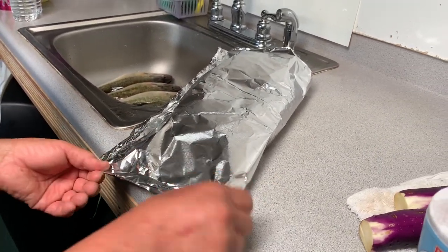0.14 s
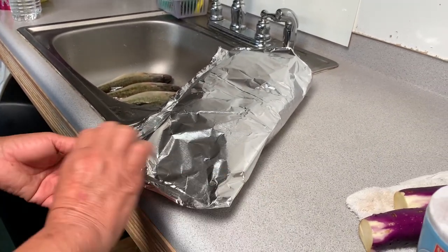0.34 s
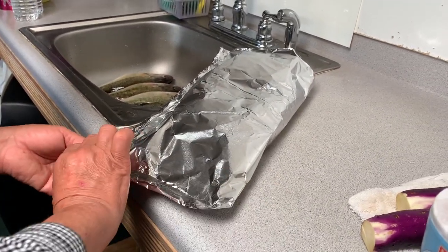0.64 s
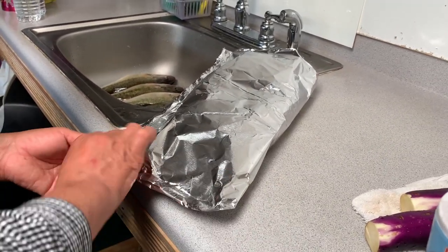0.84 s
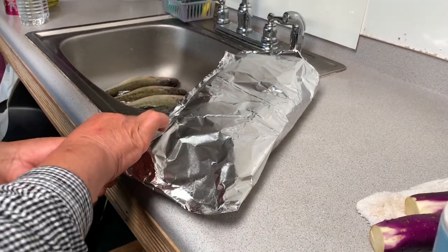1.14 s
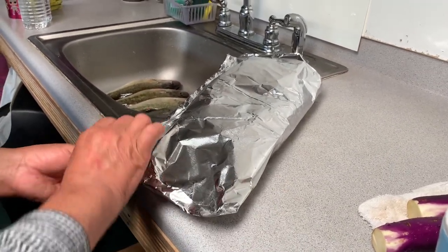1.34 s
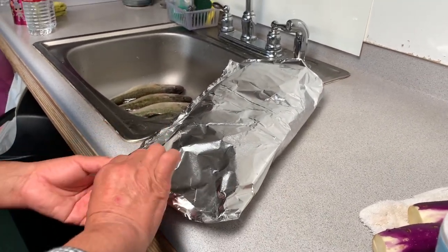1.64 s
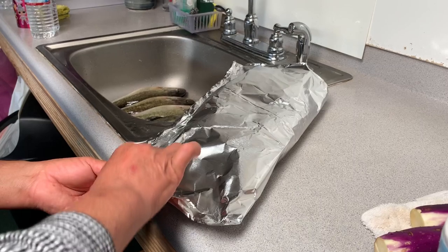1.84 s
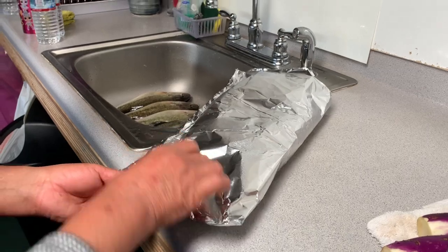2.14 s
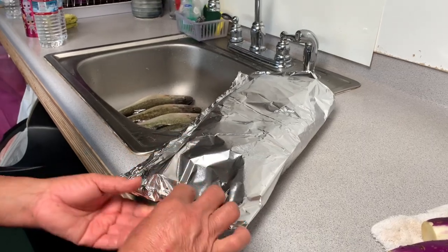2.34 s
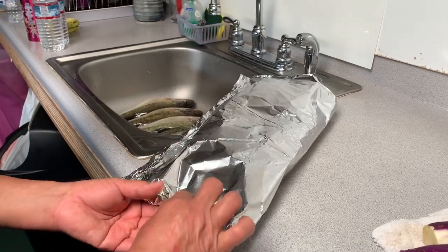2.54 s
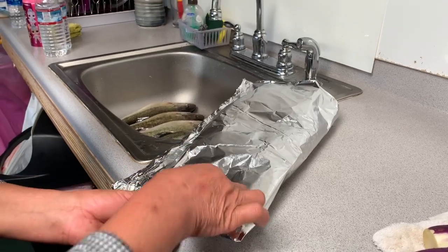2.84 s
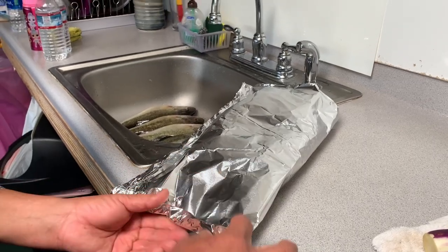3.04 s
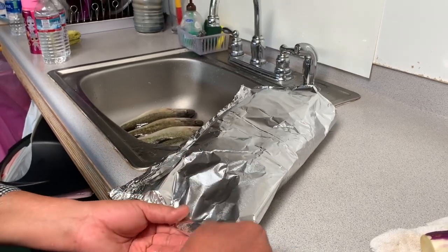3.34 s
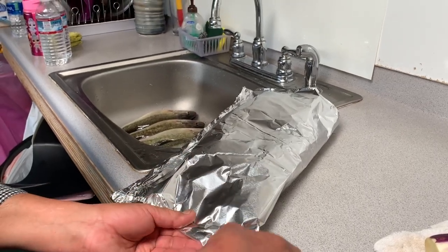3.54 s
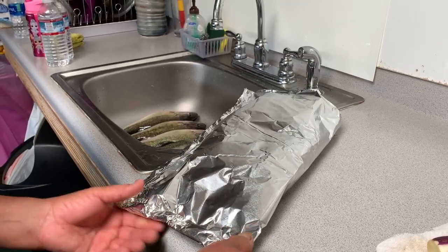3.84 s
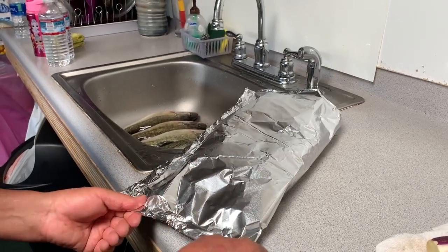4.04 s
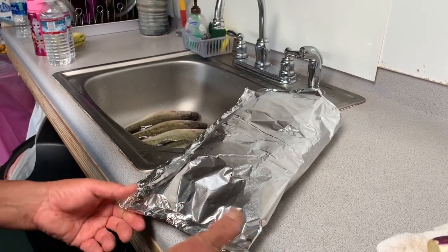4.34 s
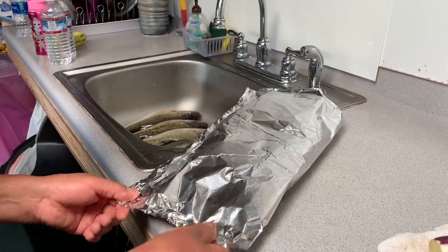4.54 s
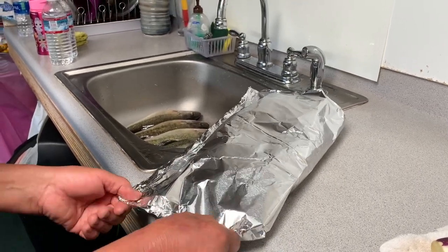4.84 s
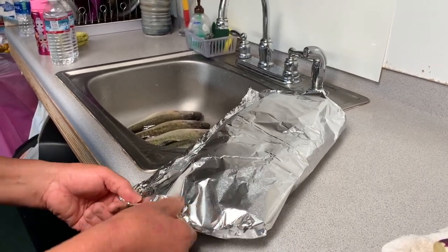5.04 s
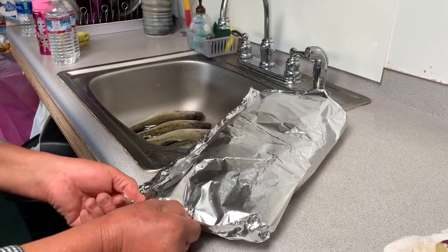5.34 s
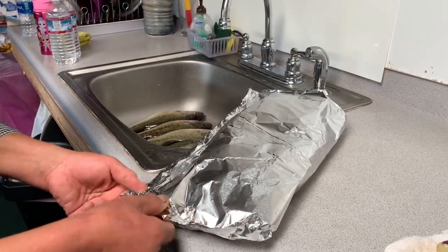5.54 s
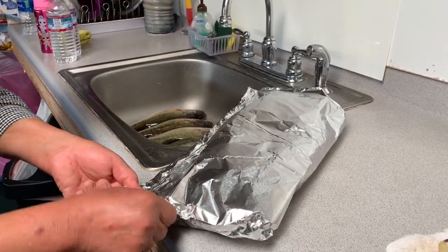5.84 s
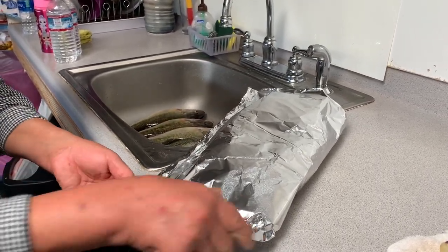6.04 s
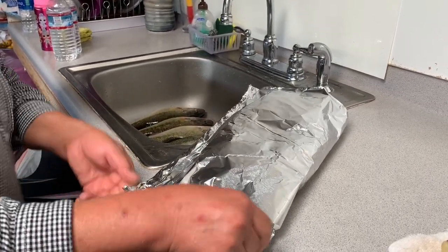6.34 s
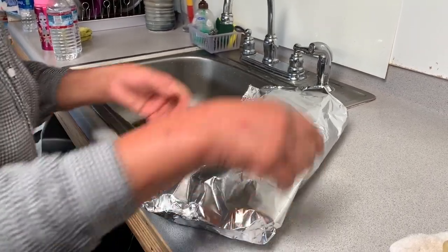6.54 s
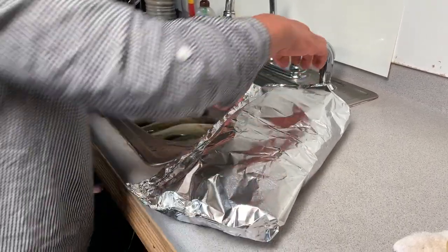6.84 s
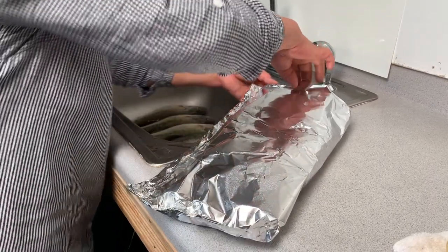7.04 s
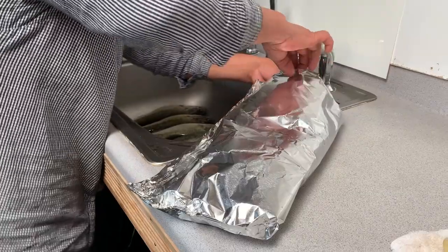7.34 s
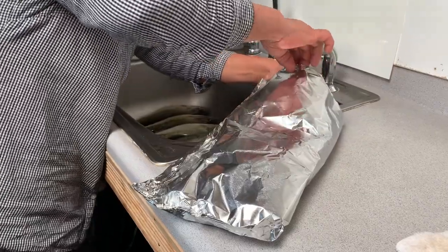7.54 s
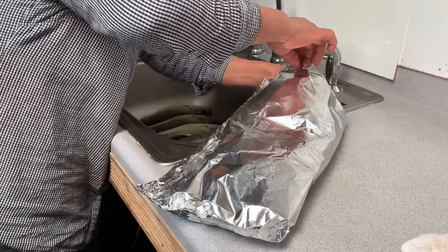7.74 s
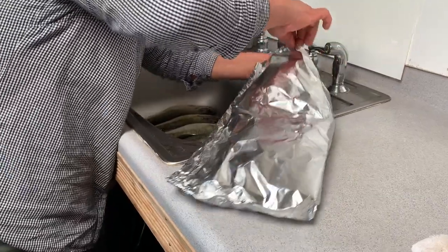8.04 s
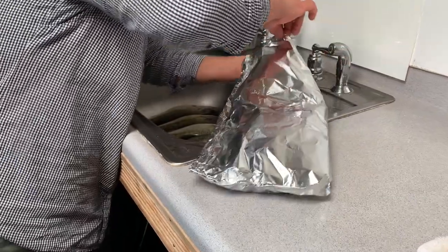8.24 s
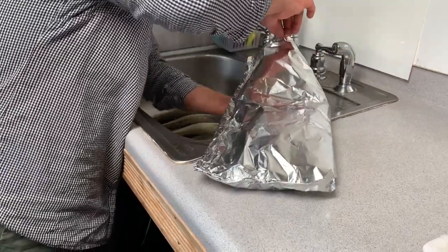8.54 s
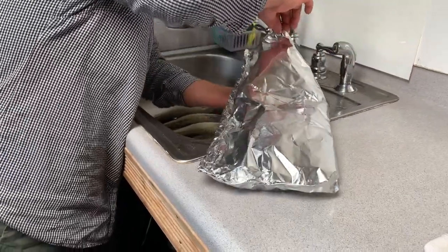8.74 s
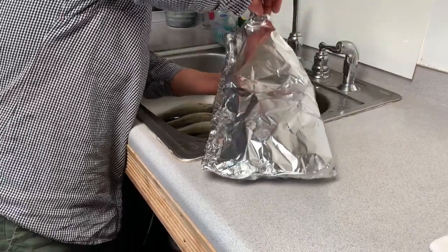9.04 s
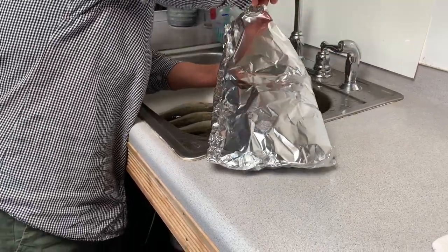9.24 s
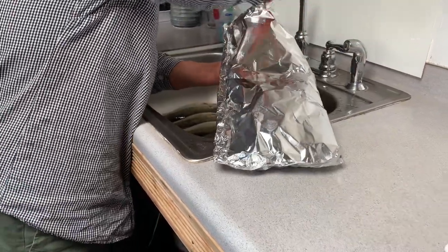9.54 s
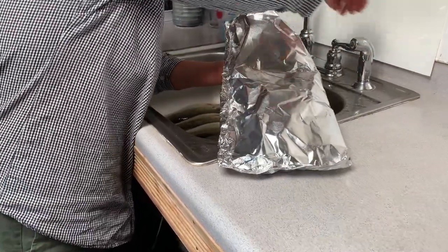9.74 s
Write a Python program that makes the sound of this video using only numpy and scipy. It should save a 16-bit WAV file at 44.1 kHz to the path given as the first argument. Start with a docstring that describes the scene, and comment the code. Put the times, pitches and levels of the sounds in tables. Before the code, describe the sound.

Close to a phone in a small hard-walled kitchen, hands crimp a foil parcel. Quiet, sparse crackles at first grow into dense bright snaps and tinny pops, pause briefly past the middle, then return as longer rustling crumples. Soft hollow bumps come from the counter. Low engine drones and traffic rumble sit far behind.

```python
"""Folding foil on a kitchen counter

Hands fold and crimp aluminium foil close to a phone: the sheet buckles in sharp snaps over a dense crackle,
both made of noise under bursts of power, with ringing dents and pops. The parcel bumps the counter (damped
notes and thuds) and something rubs (thin hiss). Engines drone outside (two sines each), mostly sinking in
pitch as they pass, over the rumble and air of the room (coloured noise)."""
import sys
import numpy as np
from scipy import signal
from scipy.fft import rfft, irfft, next_fast_len
from scipy.io import wavfile
from scipy.ndimage import uniform_filter1d, map_coordinates

SR = 44100
rng = np.random.default_rng(int(sys.argv[2]) if len(sys.argv) > 2 else 0)


def wav_record(signal):
    """Record a signal, one row per channel, as 16-bit PCM in the file named by sys.argv[1]."""
    frames = np.transpose(np.atleast_2d(signal))
    bounded = np.clip(frames, -1, 1)
    # unit amplitude maps onto the largest positive 16-bit level
    quanta = np.round(bounded * 32767).astype(np.int16)
    wavfile.write(sys.argv[1], SR, quanta)


N = 436590

# each grip of the fingers on the foil; levels before trims:
# full_grip_s, swell_before_s, held_s, crackle_db, body_over_crackle_db
GRIP_ROWS = [(0.0, .03, 0.096, -45.5, 3), (0.14, .03, 0.095, -44.5, 2.5), (0.328, .02, .05, -55, 2.5),
             (0.57, .03, .05, -66, -1), (0.8, 0.051, 0.055, -54, 2.5), (0.899, .07, 0.014, -39, -5),
             (1.075, 0.027, 0.16, -40.5, -3), (1.25, .04, 0.018, -40.5, 2.5),
             (1.381, .02, 0.0089, -42, 5.5), (1.489, 0.031, .04, -55, 5), (1.665, .02, .03, -55.5, 4.5),
             (1.742, 0.042, 0.11, -33.5, 0), (1.969, 0.068, 0.024, -27.5, -1.5),
             (2.081, .04, .1, -41.5, -1), (2.18, 0.037, 0.014, -42, 3.5), (2.269, 0.018, .02, -45, 5),
             (2.485, .02, .02, -38, 3), (2.524, .025, 0.046, -25.5, -2), (2.62, .05, .08, -33, 2.5),
             (2.719, .05, .05, -21.5, -6.5), (2.8, .04, .03, -33.5, 0.5), (2.87, .03, .03, -47, 8),
             (2.939, 0.09, .02, -36, 1.5), (3.06, 0.047, .03, -45.5, 8), (3.21, 0.016, .02, -46.5, 5),
             (3.29, 0.013, .05, -34, 0), (3.4, 0.045, 0.085, -33.5, 1), (3.739, 0.064, 0.035, -32, -1.5),
             (3.88, 0.057, .1, -54.5, 4), (4.03, 0.052, .08, -49.5, 7), (4.233, .02, 0.08, -47, 7.5),
             (4.572, 0.024, 0.096, -34, 0.5), (4.71, .04, .04, -27, -0.5), (4.868, .03, .06, -44.5, 6.5),
             (5.04, .02, .02, -61, 7), (5.09, .02, .18, -39.5, -1), (5.29, 0.03, 0.0076, -27.5, -3.5),
             (5.4, 0.051, .05, -54, 4.5), (5.5, 0.03, .02, -37.5, -1.5), (5.615, .02, .04, -34, -1.5),
             (5.659, .04, 0.0082, -32.5, 2), (5.71, 0.046, 0.074, -34.5, -1.5), (5.889, .04, .08, -49.5, 5),
             (6.165, .03, .06, -38, -2), (6.28, .03, .04, -38, 3), (6.399, 0.033, 0.045, -55, 12.5),
             (6.52, .03, .03, -63, 4), (6.62, 0.049, 0.037, -69, 6.5), (7.131, .02, .02, -26.5, -3.5),
             (7.2, .05, .08, -33.5, -3.5), (7.32, .05, 0.067, -43.5, 2.5), (7.47, 0.11, 0.082, -40, 1.5),
             (7.6, .05, 0.18, -42.5, 0), (7.785, .03, .02, -31.5, -5), (7.87, 0.052, 0.23, -35.5, -0.5),
             (8.04, 0.23, 0.21, -27, -4.5), (8.33, 0.045, 0.026, -35.5, -0.5), (8.45, 0.054, .08, -66.5, 6),
             (8.61, .02, .04, -58, 7), (8.672, 0.02, .02, -35, -3.5), (8.76, 0.14, .14, -39, -0.5),
             (8.95, .05, .05, -38.5, -2), (9.05, 0.12, .07, -29.5, -3), (9.15, .05, 0.053, -33.5, -3.5),
             (9.25, 0.055, 0.084, -43, 1), (9.4, 0.066, 0.066, -53, 6.5), (9.498, 0.054, .02, -45, 2.5)]
# left-right likeness of the near sounds: pitch_hz, likeness (1 = identical)
NEAR_ALIKE = [(200, .96), (700, .8), (1300, .84), (2200, .5), (2800, .66), (3600, .25), (6000, .1)]


def amp(db):
    """dB to gain."""
    return 10 ** (np.asarray(db) / 20)


def unit(x):
    """Scaled to rms 1."""
    return x / np.sqrt(np.mean(x ** 2) + 1e-20)


def along(points, hz):
    """(Hz, value) points joined by straight lines on a log frequency axis."""
    f, v = np.transpose(points)
    return np.interp(np.log(hz + 1), np.log(f + 1), v)


def curves(rows):
    """One value per sample for each column after the time."""
    s, *cols = np.transpose(rows)
    return [np.interp(np.arange(N) / SR, s, c) for c in cols]


def wobble(rate):
    """A smooth random curve through `rate` knots a second."""
    knots = rng.standard_normal(int(N * rate / SR) + 4)
    return map_coordinates(knots, [np.arange(N) * rate / SR])


def filtered(x, response):
    """x times a complex response of frequency."""
    m = next_fast_len(N + SR // 2)
    return irfft(rfft(x, m) * response(np.fft.rfftfreq(m, 1 / SR)), m)[..., :N]


def spread(pair, spectrum, alike):
    """Two unrelated noises, coloured at unchanged power and mixed to a left and right of given likeness."""
    hz = np.fft.rfftfreq(next_fast_len(N + SR // 2), 1 / SR)
    turn = np.arccos(np.clip(along(alike, hz), -1, 1)) / 2
    audible = hz > spectrum[0][0] / 2
    shape = unit(amp(along(spectrum, hz)) * audible)
    mid, side = filtered(pair, lambda hz: shape * [np.cos(turn), np.sin(turn)])
    return np.array([mid + side, mid - side])


def bursts(strength, t60):
    """Power that jumps at each impulse and dies 60 dB in t60 seconds, 1 on average."""
    power = signal.lfilter([1], [1, -amp(-120 / (t60 * SR))], strength ** 2)
    return power / power.mean()


def tears(times, db, lengths, rise):
    """Power under one rise and fall for each event; the rise is a share of the length."""
    power = np.zeros(N + SR)
    for s, level_db, length in zip(times, db, lengths):
        t = np.arange(round(length * SR)) / SR
        attack = 1 - np.exp(-t / (rise * length))
        shape = attack * amp(level_db - 60 * t / length)
        power[round(s * SR):][:len(t)] += shape ** 2
    return power[:N]


def rings(events, cycles, gain_db):
    """A damped sine for each (s, dB, Hz): full after one cycle, its decay reaching -60 dB after `cycles`."""
    out, t = np.zeros(N + SR), np.arange(SR // 10) / SR
    for s, db, hz in events:
        shape = np.minimum(t * hz, 1) * amp(db + gain_db - 60 * t * hz / cycles)
        out[round(s * SR):][:len(t)] += shape * np.sin(2 * np.pi * hz * t)
    return out[:N]


def foil():
    """Buckles shake the dense modes of the sheet, heard as noise in three colours; dents and pops ring on top."""
    # colours of the sheet, from the finest creases to the whole parcel: pitch_hz, relative_db_per_hz
    fizz_colour = [(5500, -25), (7200, -0.5), (9000, 2), (11000, -1.5), (13000, -1.5), (15800, -10)]
    edge_colour = [(2400, -19), (3400, -2), (4500, 1), (6000, -1.5), (7000, -3), (8500, -31)]
    body_colour = [(200, -4.5), (500, -6), (1000, -0.5), (2100, 2.5), (2900, 2), (3500, -5.5),
                   (4600, -26.5)]
    (small, working), (large, pops) = crackle(), snaps()
    shake = np.sqrt(small + large)[:, None] * rng.standard_normal((3, 2, N))
    facets = dents(rate=500, centre_hz=2146, octaves=1.46, cycles=9, scatter_db=2.5)
    shake[2] += amp(-19.5) * working * facets
    colours = zip(shake, [fizz_colour, edge_colour, body_colour])
    sheet = sum(spread(pair, colour, NEAR_ALIKE) for pair, colour in colours)
    return shifting(sheet, depth_db=2.5) + pops


def snaps():
    """A large buckle tears along its crease, sets off smaller ones around it and pops at the pitch of the dent."""
    # single loud buckles, levels before trims: start_s, fizz_db, body_over_fizz_db, pop_hz, tear_length_s
    snap_rows = [(0.059, -32, 4.5, 2420, 0.03), (0.1418, -43.5, 15, 2360, 0.09),
                 (0.218, -34, -14, 1920, 0.051), (0.2547, -53, 12.5, 2160, 0.036),
                 (0.5588, -41, -19, 920, 0.013), (0.672, -54, 1, 2000, 0.03),
                 (0.792, -49.5, 6.5, 2300, 0.037), (0.8618, -49, 13, 2420, 0.044),
                 (0.895, -32.5, -2.5, 2660, 0.051), (1.046, -45, -1, 2410, 0.02),
                 (1.0771, -29.5, 4, 2500, 0.026), (1.1483, -34.5, -5, 2413, 0.09),
                 (1.376, -35, -0.5, 1030, 0.05), (1.488, -45, 7.5, 990, 0.09),
                 (1.5723, -63, 26, 2300, 0.01), (1.707, -66, 34, 2200, 0.017),
                 (1.721, -33.5, -1, 2310, 0.039), (1.768, -25, -3.5, 2450, 0.05),
                 (1.858, -39, 1.5, 1520, 0.04), (1.8776, -31, -6, 2160, 0.024),
                 (1.925, -33.5, 7.5, 2340, 0.031), (1.9454, -34, 8, 2360, 0.09),
                 (1.9748, -25, -6, 2740, 0.06), (2.0776, -15, -25.5, 2950, 0.005),
                 (2.0902, -28.5, 7, 3100, 0.027), (2.1288, -39, 9, 2293, 0.041),
                 (2.2638, -39.5, 5.5, 1180, 0.012), (2.4463, -48.5, 6.5, 1570, 0.07),
                 (2.4747, -36, 5, 1313, 0.064), (2.5051, -30, -6, 1900, 0.09),
                 (2.518, -25.5, -11, 1280, 0.09), (2.6196, -27, 1, 1860, 0.04),
                 (2.6665, -27.5, -10, 1150, 0.09), (2.6962, -33, 7, 1460, 0.09),
                 (2.7102, -22, 4, 1470, 0.08), (2.7952, -25, -2.5, 2500, 0.09),
                 (2.8519, -40.5, 13.5, 1532, 0.037), (2.8732, -40.5, 18.5, 1665, 0.021),
                 (2.922, -37, 10, 1520, 0.09), (3.032, -58, 26.5, 980, 0.039),
                 (3.0476, -34.5, -6.5, 1366, 0.072), (3.0856, -20.5, -11.5, 1750, 0.007),
                 (3.207, -32, 3, 2930, 0.09), (3.2766, -30, -2.5, 2770, 0.09),
                 (3.2431, -46, 11.5, 2760, 0.024), (3.3234, -30.5, 6.5, 1840, 0.023),
                 (3.3808, -34, 9.5, 1492, 0.039), (3.3966, -23.5, 2.5, 1850, 0.028),
                 (3.457, -29, 2, 1610, 0.03), (3.5318, -40.5, 10.5, 1510, 0.022),
                 (3.612, -56, 24.5, 1990, 0.011), (3.6603, -58.5, 14, 1788, 0.062),
                 (3.6932, -38.5, -0.5, 1710, 0.011), (3.7156, -44.5, 3, 1230, 0.09),
                 (3.7336, -7.5, -21.5, 2700, 0.005), (3.7515, -24, -2.5, 3270, 0.08),
                 (4.0166, -45, 12.5, 1279, 0.03), (4.04, -37.5, -0.5, 1874, 0.035),
                 (4.069, -35, 7.5, 1750, 0.04), (4.0991, -31, 3, 2060, 0.026),
                 (4.23, -31.5, 7, 2130, 0.057), (4.293, -39, -14, 2170, 0.013),
                 (4.3446, -39, 1.5, 1444, 0.034), (4.4893, -67, 31, 1810, 0.027),
                 (4.5328, -50.5, 19, 1860, 0.038), (4.588, -29.5, 6, 2475, 0.09),
                 (4.6124, -21, -11.5, 2500, 0.051), (4.6398, -19, 0, 3110, 0.077),
                 (4.6905, -22, -1, 1275, 0.051), (4.7416, -12, -11, 1856, 0.032),
                 (4.8199, -42, -4, 1990, 0.023), (4.87, -32.5, 5.5, 1206, 0.09),
                 (4.9394, -35, 9.5, 2150, 0.029), (5.033, -40, 7.5, 2110, 0.057),
                 (5.0883, -25, -0.5, 930, 0.071), (5.1116, -18, 0, 1900, 0.024),
                 (5.158, -41.5, 13, 1900, 0.035), (5.2267, -37.5, 7, 1920, 0.027),
                 (5.2536, -26.5, -6.5, 2740, 0.034), (5.2665, -36, 10, 2340, 0.033),
                 (5.286, -17, 4, 2720, 0.01), (5.3372, -33.5, 8, 2190, 0.006),
                 (5.4353, -50, 12, 1850, 0.036), (5.491, -45, 11, 2080, 0.012),
                 (5.5157, -32, 7.5, 2480, 0.028), (5.6083, -32.5, -3, 2860, 0.02),
                 (5.62, -35, 4, 2530, 0.024), (5.6496, -17.5, -2.5, 2538, 0.042),
                 (5.7162, -16, -14, 2840, 0.005), (5.736, -35, 10.5, 2560, 0.027),
                 (5.754, -37.5, 15.5, 2494, 0.007), (5.7693, -32, -9, 2030, 0.013),
                 (5.8864, -44.5, 15.5, 2250, 0.037), (5.9293, -38, -10, 2628, 0.066),
                 (5.9775, -56, 10.5, 850, 0.069), (6.1481, -52, 18, 1247, 0.042),
                 (6.1635, -20, -0.5, 2160, 0.019), (6.221, -26.5, -13, 2010, 0.005),
                 (6.26, -51.5, 22.5, 1270, 0.007), (6.2807, -16, -6.5, 3150, 0.017),
                 (6.314, -41.5, 8, 1119, 0.036), (6.3987, -51, 22, 953, 0.035), (6.496, -46, 2, 850, 0.053),
                 (7.131, -20.5, -18, 2310, 0.017), (7.1963, -28, -1, 1372, 0.09),
                 (7.2134, -32, 5.5, 1850, 0.07), (7.267, -39.5, -0.5, 2545, 0.026),
                 (7.443, -47.5, 13.5, 2704, 0.087), (7.471, -26.5, -2, 1830, 0.059),
                 (7.526, -40, 10.5, 1940, 0.037), (7.669, -40.5, -2, 1950, 0.042),
                 (7.7297, -49, 10, 860, 0.084), (7.7796, -23, -7, 2750, 0.075),
                 (7.862, -28.5, 0, 1670, 0.085), (7.9798, -30, 7.5, 2900, 0.034),
                 (8.0756, -29, 3.5, 1900, 0.09), (8.211, -32, -5, 2760, 0.08),
                 (8.3328, -26, -2.5, 920, 0.044), (8.6062, -55.5, 19, 1000, 0.057),
                 (8.7714, -51, 18.5, 1750, 0.09), (8.8273, -49, 14, 2580, 0.033),
                 (8.947, -45, 5.5, 1140, 0.09), (9.0093, -32.5, 9.5, 3180, 0.022),
                 (9.06, -28, 3, 2130, 0.05), (9.19, -45.5, -0.5, 2647, 0.068),
                 (9.2995, -41, 11, 1660, 0.042), (9.5052, -38, 2.5, 1670, 0.054)]
    s, fizz_db, body_over_db, pop_hz, length = np.transpose(snap_rows)
    # the edge lies 63% of the way from fizz to body, and 6.5 dB lower
    edge_db = fizz_db + 0.63 * body_over_db - 6.5
    body_db = fizz_db + body_over_db
    followers = bursts(buckles(rate=320, scatter_db=4, most_db=14.5), t60=0.017)

    def settle(level_db, extra):
        """The smaller buckles die away over a longer time than the tear, by `extra` seconds."""
        return followers * tears(s, level_db, length + extra, rise=0.013)

    fizz = tears(s, fizz_db - 2.5, length, rise=0.011) + settle(fizz_db - 21.5, extra=0.029)
    edge = tears(s, edge_db, length + 0.004, rise=0.038) + settle(edge_db - 12.5, extra=0.091)
    body = tears(s, body_db - 5.5, length + 0.0036, rise=0.048) + settle(body_db - 12.5, extra=0.074)
    pops = rings(np.transpose([s, body_db, pop_hz]), cycles=46, gain_db=-3.5)
    return np.array([fizz, edge, body]), pops


def crackle():
    """Power in the three colours from countless small buckles; the colour drifts as the grip moves."""
    peak_db, more_db = np.transpose(GRIP_ROWS)[-2:]
    level_db = gripping(peak_db, swell_db=23.6, fall_db=350, rest_db=-72.5)
    whole_db = gripping(peak_db + more_db, swell_db=15, fall_db=220, rest_db=-67.5)
    slips = buckles(rate=790, scatter_db=5.5, most_db=15.0)
    more = buckles(rate=250, scatter_db=16, most_db=22.5)
    between_db = level_db + 0.59 * (whole_db - level_db)
    fizz = amp(level_db - 9 + 1.9 * wobble(14)) ** 2 * bursts(slips, t60=0.032)
    edge = amp(between_db - 12 + 1.2 * wobble(13)) ** 2 * bursts(slips + 0.31 * more, t60=0.06)
    body = amp(whole_db - 8.5) ** 2 * bursts(slips + more, t60=0.11)
    return np.array([fizz, edge, body]), amp(whole_db)


def gripping(peak_db, swell_db, fall_db, rest_db):
    """Level in dB: each grip swells by swell_db, holds and falls by fall_db a second; the strongest is heard."""
    t, out = np.arange(N) / SR, np.full(N, float(rest_db))
    for (s, swell, held, *_), db in zip(GRIP_ROWS, peak_db):
        near = slice(max(round((s - .5) * SR), 0), round((s + 1) * SR))
        early = np.maximum(s - t[near], 0)
        late = np.maximum(t[near] - s - held, 0)
        out[near] = np.maximum(out[near], db - swell_db * early / swell - fall_db * late)
    return out


def buckles(rate, scatter_db, most_db):
    """Creases give way at random moments, `rate` a second; few are large, none beyond a limit."""
    moments = rng.random(N) < rate / SR
    size_db = scatter_db * rng.exponential(size=N)
    return moments * amp(most_db * np.tanh(size_db / most_db))


def dents(rate, centre_hz, octaves, cycles, scatter_db):
    """Small flat facets flip over, each ringing a few cycles at its own pitch, out of step left to right."""
    draw = rng.random((round(rate * N / SR), 5))
    when, pitch_a, pitch_b, size, step = draw.T[:, :, None]
    hz = centre_hz * 2 ** (octaves * (pitch_a + pitch_b - 1))
    cycle = hz * np.arange(256) / SR
    level_db = -scatter_db * np.log(0.1 + size)
    ring = amp(level_db - 60 * cycle / cycles) * np.minimum(2 * cycle, 1)
    at = (when * N).astype(int) + np.arange(cycle.shape[1])
    pair = [ring * np.sin(2 * np.pi * cycle), ring * np.sin(2 * np.pi * (cycle + step))]
    return unit(np.array([np.bincount(at.ravel(), p.ravel(), N + SR)[:N] for p in pair]))


def shifting(x, depth_db):
    """The crumpled sheet changes shape and its resonances move with it: patches of random gain."""
    z = signal.stft(x, nperseg=256)[2]
    field = rng.standard_normal(z.shape[1:])
    field = uniform_filter1d(field, size=3, axis=0)  # smooth over frequency
    field = uniform_filter1d(field, size=4, axis=1)  # smooth over time
    return signal.istft(z * amp(depth_db * unit(field)), nperseg=256)[1][:, :N]


def bumps():
    """The parcel and knuckles touch the counter: each gives a short hollow note and a broad, dull thud."""
    # touches, levels before trims: start_s, level_db, pitch_hz
    touches = [(0.217, -45, 210), (2.283, -43, 150.7), (2.541, -38.5, 431), (3.086, -35, 396),
               (3.334, -36.5, 498), (3.736, -35, 314), (4.333, -35.5, 463), (4.642, -41, 366),
               (4.718, -42, 353), (5.088, -36.5, 493), (5.98, -34, 457), (6.307, -27.5, 311),
               (7.51, -33, 400), (7.818, -35.5, 208), (8.272, -52, 317.5), (8.984, -39, 153.2)]
    # the counter under a soft blow: pitch_hz, relative_db_per_hz
    thud_colour = [(120, -27.5), (250, -2.5), (500, 1.5), (900, -4.5), (1500, -25)]
    s, db, _ = np.transpose(touches)
    power = tears(s, db, np.full(len(s), .04), rise=0.015)
    blow = np.sqrt(power) * rng.standard_normal((2, N))
    return rings(touches, cycles=5, gain_db=3) + spread(blow, thud_colour, NEAR_ALIKE)


def rubbing():
    """Something rubs faintly near the sink: a thin hiss that swells and fades."""
    # rubs, levels before the wobble: start_s, length_s, level_db
    rubs = [(8.394, 0.21, -62), (9.4, 0.73, -72.5)]
    # the hiss: pitch_hz, relative_db_per_hz
    hiss_colour = [(3200, -15), (4200, -4), (4900, 0), (5800, -5), (7000, -20.5)]
    t = np.arange(N) / SR
    swell = sum(amp(db) * np.sin(np.pi * np.clip((t - s) / length, 0, 1)) for s, length, db in rubs)
    hiss = spread(rng.standard_normal((2, N)), hiss_colour, NEAR_ALIKE)
    return swell * amp(2 * wobble(25)) * hiss


def kitchen(x):
    """Hard walls and the sink answer as a tail of noise; each frequency dies at its own speed."""
    # decay: pitch_hz, t60_s
    decay = [(200, 0.52), (2000, 0.18), (6000, 0.16), (15000, 0.025)]
    hz, t, z = signal.stft(rng.standard_normal((2, SR // 2)), SR, nperseg=256)
    fade = amp(-60 * t / along(decay, hz)[:, None])
    tail = signal.istft(z * fade, SR, nperseg=256)[1]
    delayed = np.pad(x, (150, 0))[None]  # samples before the answer
    return signal.fftconvolve(delayed, tail / np.linalg.norm(tail[0]), axes=1)[:, :N]


def engine(rows, waver_db):
    """A drone at the firing rate with its octave, fading in and out at the ends of the pass."""
    hz, db, octave_db = curves(rows)
    t = np.arange(N) / SR
    heard = np.clip(np.minimum(t - rows[0][0], rows[-1][0] - t) / 0.066, 0, 1)
    phase = 2 * np.pi * np.cumsum(hz) / SR + 0.48 * wobble(5)
    firing = amp(db + waver_db * wobble(6.3)) * np.sin(phase)
    octave = amp(octave_db + 3 * wobble(4)) * np.sin(2 * phase)
    return np.sqrt(2) * heard * (firing + octave)  # root 2: levels are rms


def engines():
    """Three engines pass, their drones a little stronger on the left."""
    # passes, levels before waver and balance: time_s, firing_hz, level_db, octave_db
    first_pass = [(.25, 67.96, -46, -49.5), (1.1, 64.95, -35, -58), (1.53, 64.4, -33, -70),
                  (2.1, 64.4, -35.5, -51.5), (2.8, 63.83, -40.5, -53.5), (4, 62.76, -48.5, -64),
                  (6.3, 61.98, -40.5, -63), (7, 61.54, -55, -59), (9.1, 61.55, -61, -60),
                  (9.5, 61.34, -44, -49), (10.1, 61.6, -45, -56.5)]
    second_pass = [(5, 55.6, -67, -70), (6, 54.52, -54.5, -78), (6.9, 53.1, -37.5, -58),
                   (7.6, 52.62, -40.5, -72), (8.1, 51.47, -35, -64), (8.67, 50.06, -37, -62),
                   (9, 47.73, -36.5, -66), (9.5, 45.3, -38, -66)]
    third_pass = [(6.9, 88.6, -56, -82), (7.7, 89, -53, -73), (8.2, 84.8, -38.5, -73),
                  (8.6, 82.7, -48, -75), (9, 81.3, -39, -66)]
    drones = engine(first_pass, waver_db=1.5) + engine(second_pass, waver_db=2) + engine(third_pass, waver_db=2)
    return drones * amp([[.4], [-.4]])


def room():
    """Traffic rumble through the walls, the same on both sides, and the air of the room: slowly varying noise."""
    # levels before trims: time_s, rumble_db, air_db
    room_levels = [(0.0, -35, -53.5), (0.33, -44.5, -56.5), (1.79, -38, -54.5), (2.4, -41, -56.5),
                   (2.73, -39, -54.5), (3.03, -42.5, -56.5), (6.73, -38, -55.5), (7.75, -35.5, -53.5),
                   (8.08, -32, -50), (8.3, -39, -51.5), (9.9, -32, -51.5)]
    # colours: pitch_hz, relative_db_per_hz
    rumble_colour = [(15, -17.5), (30, 13.5), (50, 19), (75, 13.5), (110, 0.5), (145, -13.5), (170, -22.5),
                     (230, -50.5)]
    air_colour = [(150, 3.5), (250, -3.5), (400, -4.5), (850, -7.5), (1500, -13), (2500, -18.5),
                  (3500, -29), (5000, -31), (6500, -53.5), (9000, -41.5), (16000, -68.5)]
    # left-right likeness of the air: pitch_hz, likeness (1 = identical)
    air_alike = [(100, 0.78), (300, 0.99), (640, 0.12), (1400, 0.031)]
    rumble_db, air_db = curves(room_levels)
    rumble = spread(rng.standard_normal((2, N)), rumble_colour, [(30, 1.0), (150, 1.0)])
    air = spread(rng.standard_normal((2, N)), air_colour, air_alike)
    stir_db = .8 * wobble(6)
    return amp(rumble_db - 4.0 + 1.5 * wobble(3.3)) * rumble + amp(air_db + 4.0 + stir_db) * air


def scene():
    """Foil, bumps and rubs near, with the kitchen's answer; engines and room behind."""
    near = foil() + bumps() + rubbing()
    return near + amp(-11.5) * kitchen(near[0]) + room() + engines()


def record(dry):
    """The phone tilts the channels by frequency; its top treble is one signal that reaches the left late."""
    # channel balance: pitch_hz, left_minus_right_db
    balance = [(350, 0.5), (800, 2.5), (2200, 6.5), (3600, 0.5), (5000, -1.5), (6000, -4.5), (7000, -9.5)]
    shared_hz, top_hz = 6570, 15800  # middle of the change to one microphone; upper limit of the sound
    lag_s, lag_turns = .0002677, .095  # left delay of the shared treble and its phase offset

    def shared(hz):
        """Share of the power that both channels take from one microphone."""
        return np.clip((hz - shared_hz) / 900 + .5, 0, 1)

    def apart(hz):
        """Gain of each channel's own signal."""
        return np.sqrt(1 - shared(hz)) * amp(np.outer([.5, -.5], along(balance, hz)))

    def late(hz):
        """Half of the lag on either side."""
        return np.exp(1j * np.pi * np.outer([-1, 1], lag_s * hz - lag_turns))

    both = filtered(dry, apart) + filtered(dry[0], lambda hz: np.sqrt(shared(hz)) * late(hz))
    return filtered(both, lambda hz: hz < top_hz)


dry = scene()
out = record(dry)
wav_record(out)
```